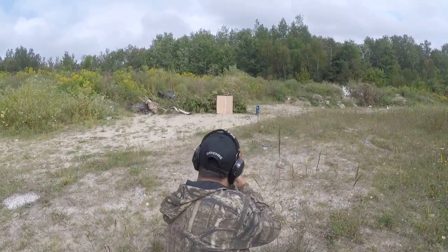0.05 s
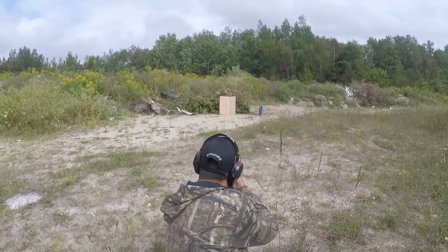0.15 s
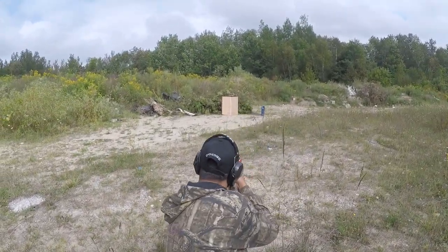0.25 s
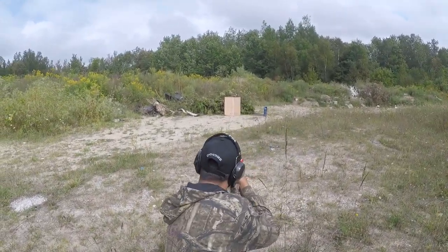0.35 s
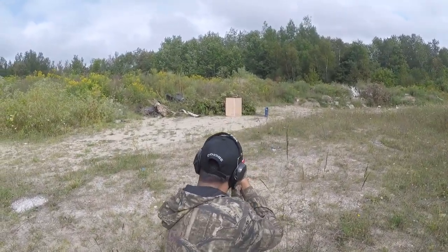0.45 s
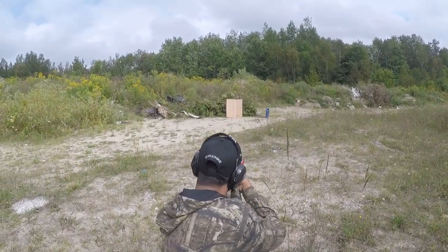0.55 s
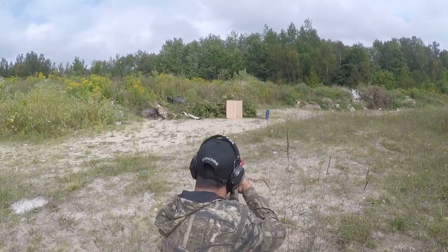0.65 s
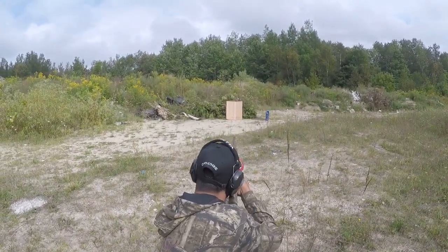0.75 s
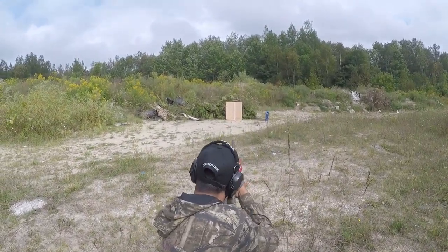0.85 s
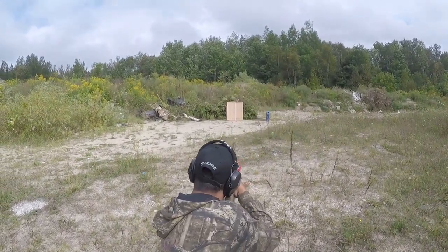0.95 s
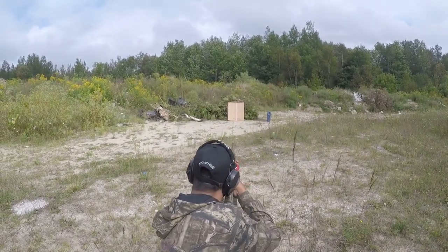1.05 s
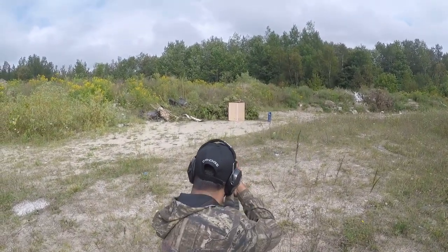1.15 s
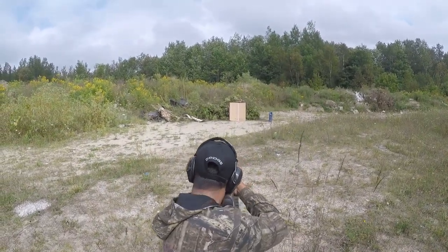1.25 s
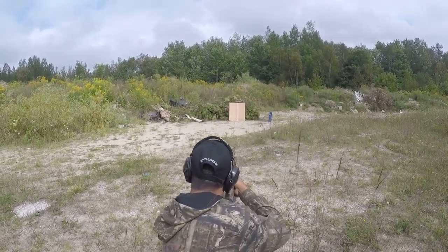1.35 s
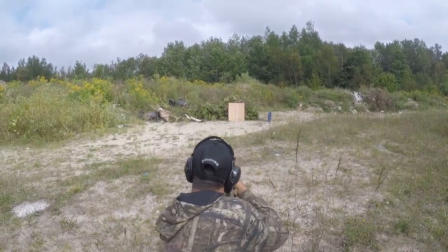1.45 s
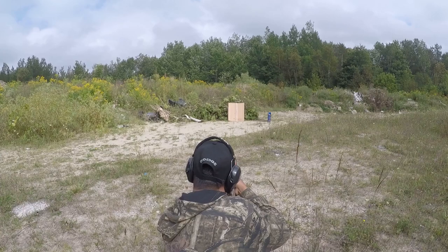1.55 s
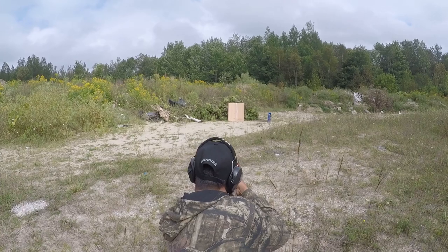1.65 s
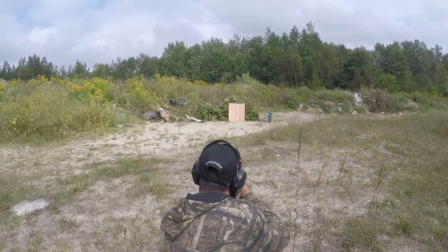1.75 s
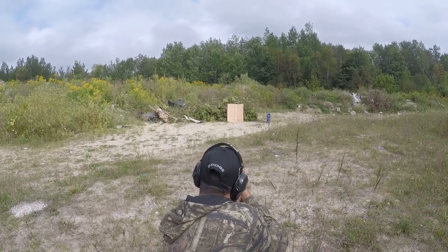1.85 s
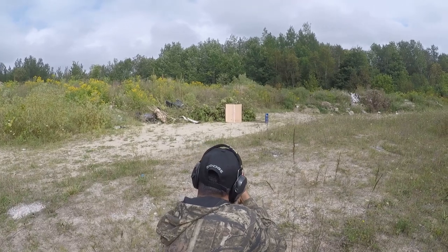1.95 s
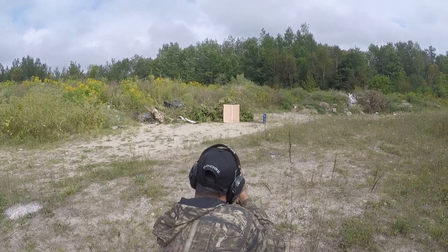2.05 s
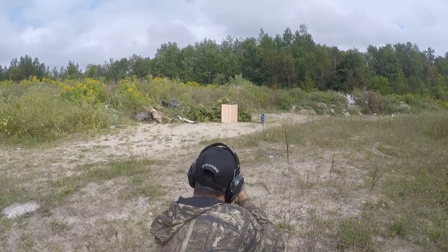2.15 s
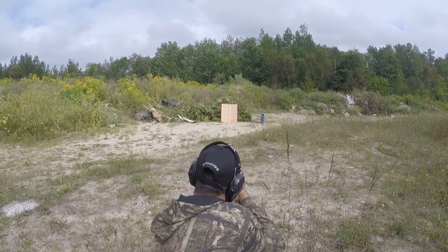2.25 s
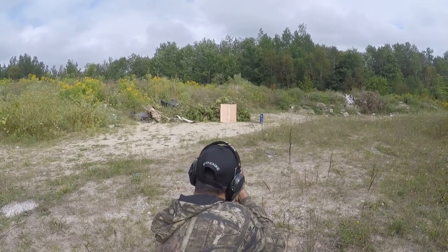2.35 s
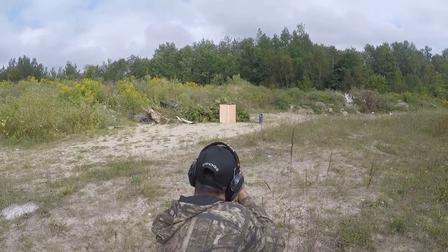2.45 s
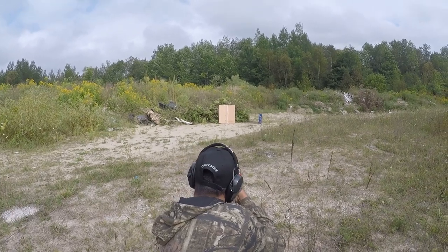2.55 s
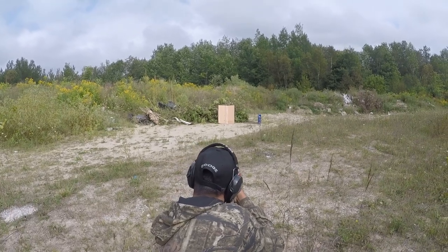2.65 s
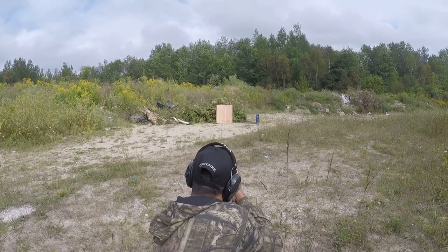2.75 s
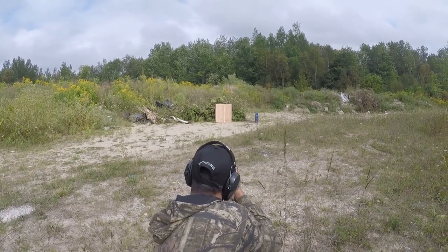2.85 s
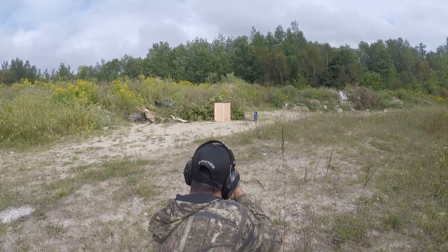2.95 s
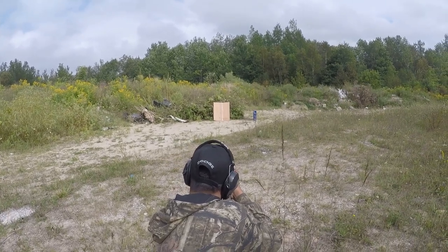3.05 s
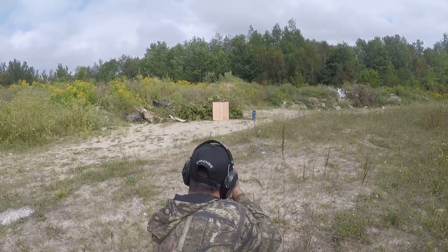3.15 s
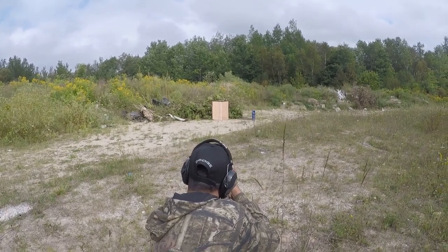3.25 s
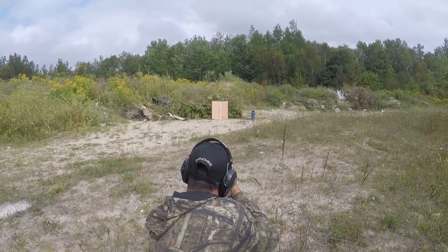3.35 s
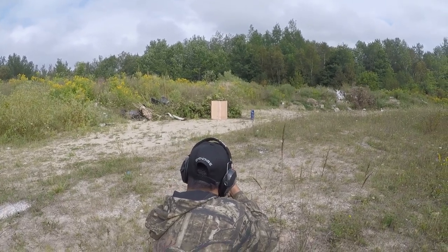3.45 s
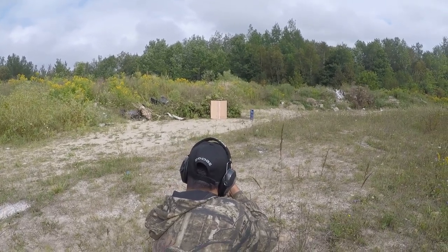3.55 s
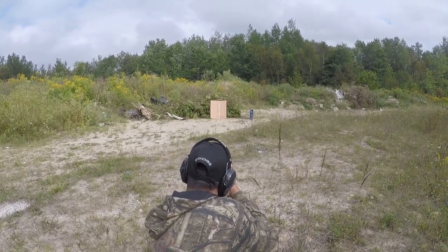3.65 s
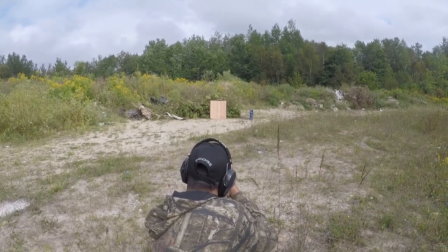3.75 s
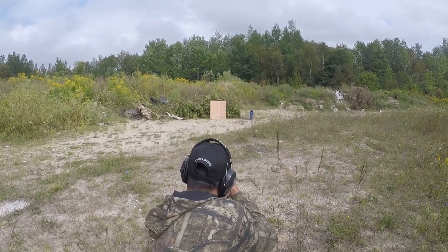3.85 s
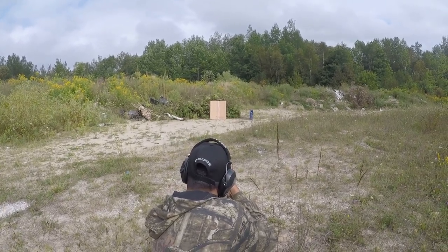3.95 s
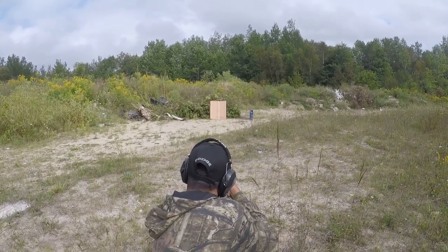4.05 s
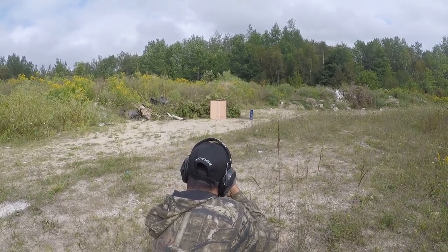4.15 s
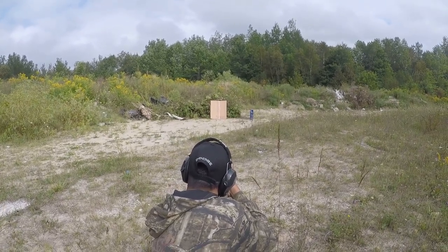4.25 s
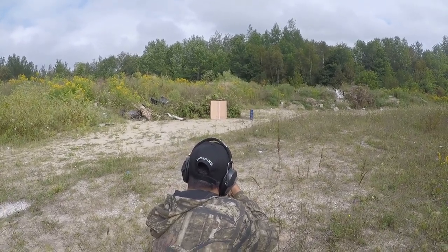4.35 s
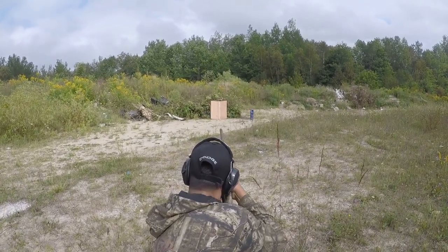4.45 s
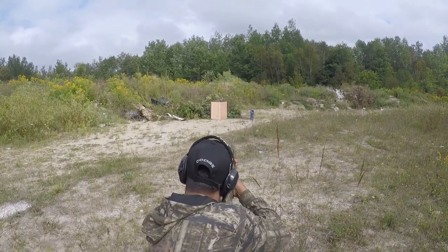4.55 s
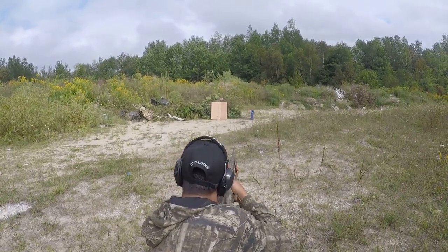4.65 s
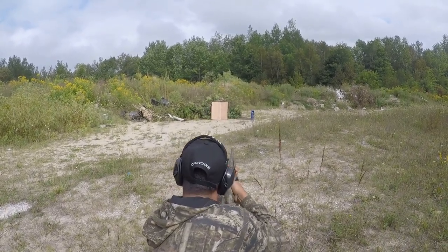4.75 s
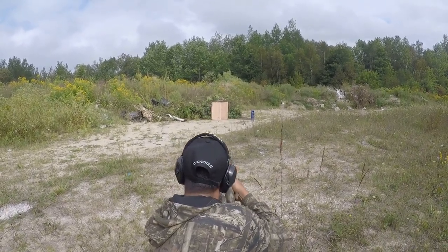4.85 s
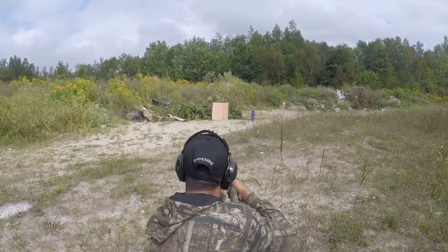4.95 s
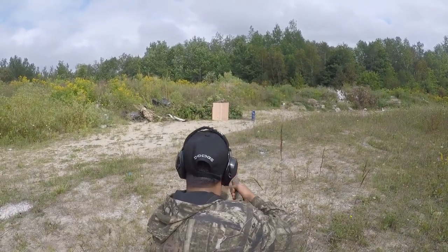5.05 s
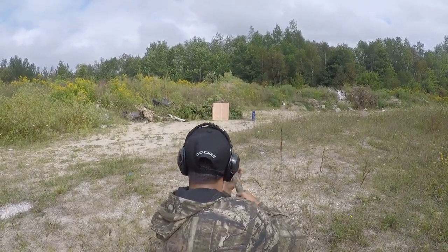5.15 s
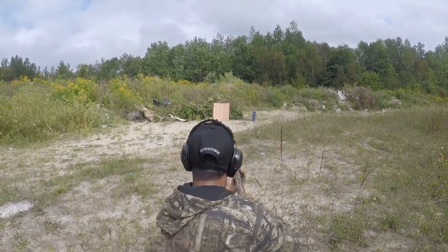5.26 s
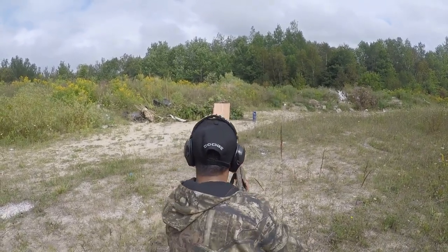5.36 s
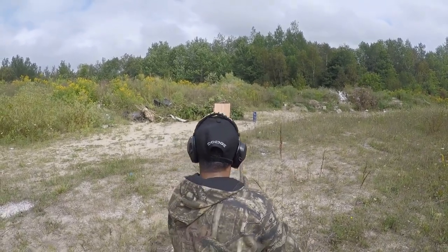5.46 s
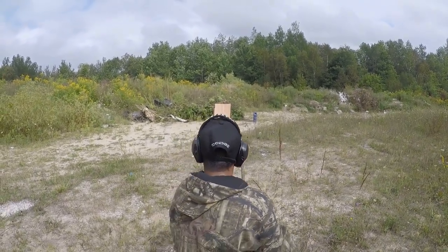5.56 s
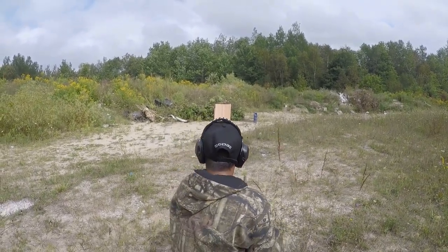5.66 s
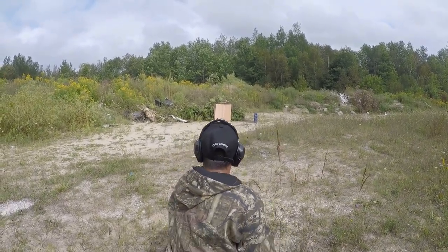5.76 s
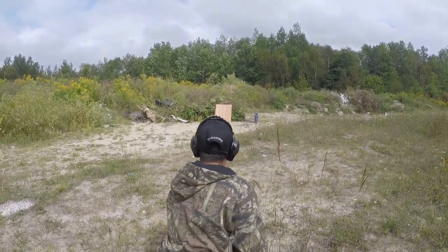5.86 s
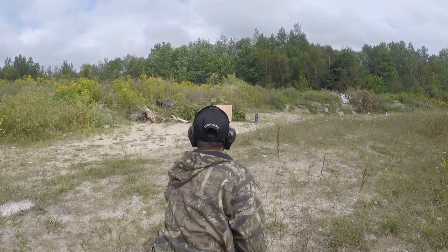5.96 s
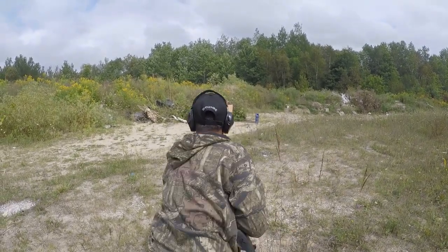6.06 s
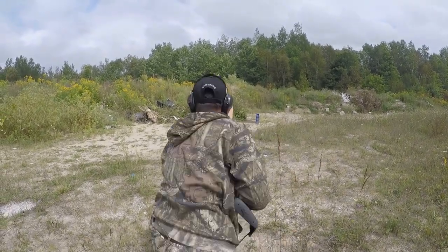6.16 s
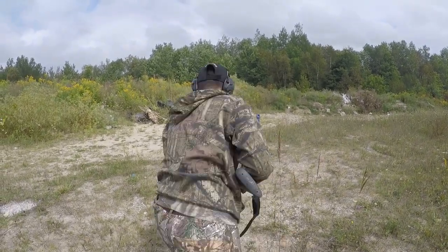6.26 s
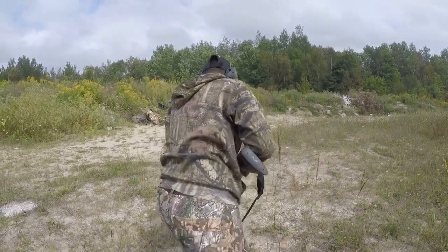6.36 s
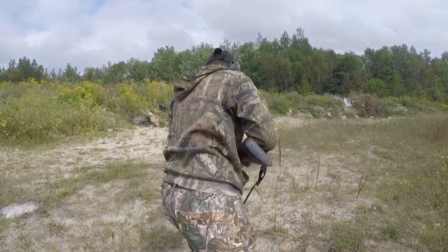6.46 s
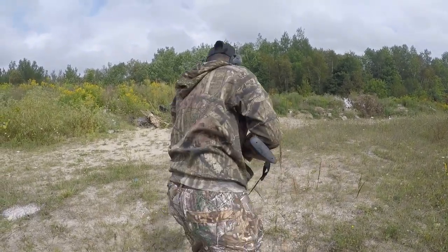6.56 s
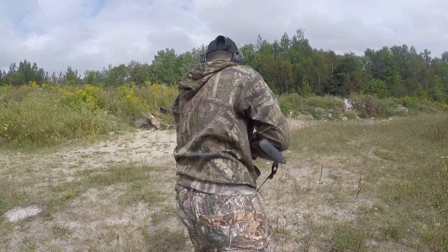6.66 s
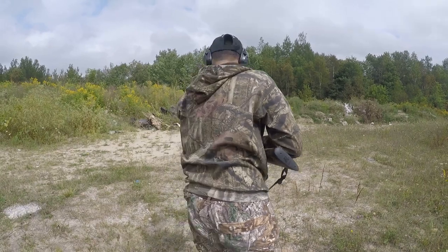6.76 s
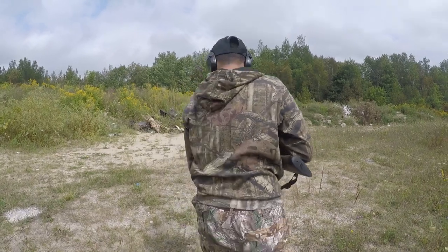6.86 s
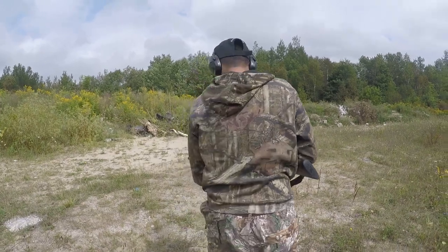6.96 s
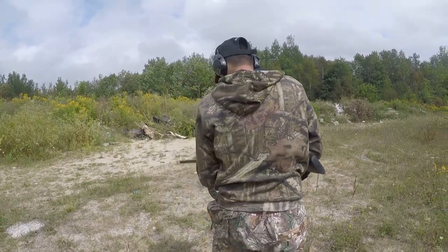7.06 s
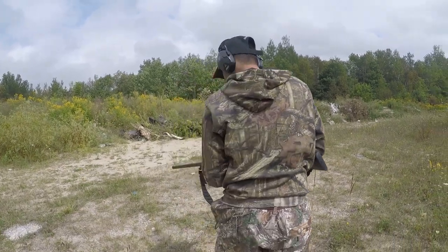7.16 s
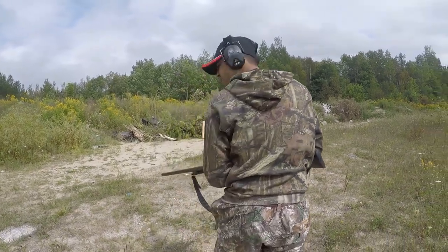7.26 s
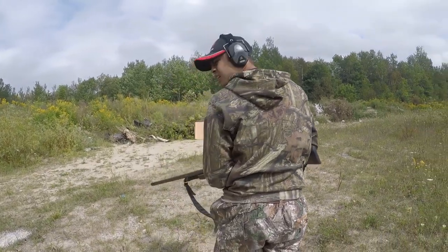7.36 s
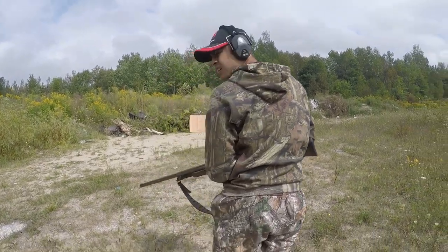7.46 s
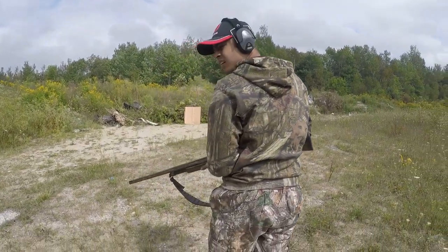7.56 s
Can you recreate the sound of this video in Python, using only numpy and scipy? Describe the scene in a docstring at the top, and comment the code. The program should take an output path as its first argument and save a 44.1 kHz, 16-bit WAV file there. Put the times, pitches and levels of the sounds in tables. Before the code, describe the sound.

A single shotgun blast echoes off trees outdoors, amid close microphone knocks, faint insects and a sharp metal click as the action opens.

```python
"""Shot in a grassy clearing

One shot, heard from a small hand-held camera behind the shooter: a cluster of cracks over a low thump,
then the roar sent back by the tree line. The safety clicks before it and the bolt slides open after it.
Close up, the housing knocks in the hand, fingers tap the stock, cloth rustles and wind puffs on the two
microphone ports. Behind, a cricket, far insects and airy hiss duck under the shot and climb back."""
import sys
import numpy as np
from scipy import signal
from scipy.io import wavfile

SR = 44100
rng = np.random.default_rng(int(sys.argv[2]) if len(sys.argv) > 2 else 0)


def bounce(signal):
    """Save signal as a 16-bit WAV file at the path given by the first command-line argument."""
    frames = np.transpose(np.atleast_2d(signal))
    limited = np.clip(frames, -1, 1)
    pcm = np.round(limited * 32767).astype(np.int16)
    wavfile.write(sys.argv[1], SR, pcm)


N = 335160

# cracks of the shot: t/s, pop level/dB, spit level/dB
CRACKS = [(4.391, -25.5, -19), (4.396, -42.5, -36), (4.402, -16.5, -26.5), (4.4134, -5.5, -16.5),
          (4.4181, -19, -24), (4.423, -4.5, -19.5), (4.4297, -2.5, -12), (4.434, -17, -0.5),
          (4.4365, -14.5, -32)]
# ring of each pop: f/Hz, level/dB, t60/s
POP_MODES = [(668, 1, 0.02), (874, 4, 0.018), (1370, -11, 0.019)]
# tone of the spitting gas: f/Hz, density/dB
GAS_SPECTRUM = [(150, -18), (350, 9), (900, 7.5), (1770, 6), (2970, 6.5), (4840, 0), (5900, 4),
                (8500, -14.5), (10700, -27), (12300, -16), (15000, -38)]
# stereo width of gas and roar: f/Hz, left-right correlation
SHOT_CORRELATION = [(60, 0.37), (130, 0.47), (290, 1), (630, 0.53), (1380, 0.19), (3020, 0.73),
                    (6610, 0.69), (14500, 0.024)]
# their placement: f/Hz, pan/dB
SHOT_PAN = [(60, -1.5), (180, 0.5), (540, -1.5), (1610, -2.5), (4830, -0.5), (14500, 1.5)]
def blast():
    """Pops with a spit of gas each, over a swelling thump, hiss and thin whistle."""
    times, pop_db, spit_db = np.transpose(CRACKS)
    pops = -sum(from_db(db) * ring(strikes(times, pop_db), hz, t60) for hz, db, t60 in POP_MODES) / 2
    pops = butter(pops, 2, 2200)   # soft front
    pops = np.array([pops, 0.86 * np.roll(pops, 4)])   # the far port hears it later and weaker
    spit = die_away(strikes(times, spit_db), t60=0.011)
    hiss = swell(4.405, .029, .003, .005, db=-24)
    gas = coloured(GAS_SPECTRUM, SHOT_CORRELATION, SHOT_PAN, span=(4.38, 4.5)) * (spit + hiss)
    thump_hz, whistle_hz, crest_s, lag_rad = 144, 7920, 4.4213, np.array([[0], [0.7]])
    t = np.arange(N) / SR - crest_s
    left, right = swell(4.399, .017, .012, .015, db=-7), swell(4.401, .010, .018, .009, db=-15)
    thump = np.array([left, right]) * np.cos(2 * np.pi * thump_hz * t - lag_rad)
    whistle = swell(4.4, .025, .005, .011, db=-32) * np.sin(2 * np.pi * whistle_hz * t)
    return pops + gas + thump + whistle


# roar from the bushes, then the tree line: t/s, level/dB
ROAR_ENVELOPE = [(4.44, -50.5), (4.55, -61), (4.60, -51.5), (4.66, -59.5), (4.725, -57), (4.759, -38),
                 (4.81, -43.5), (4.88, -37.5), (5.0, -45), (5.3, -50.5), (6.75, -53.5), (6.95, -50)]
# its tone before the treble tilt: f/Hz, density/dB
ROAR_SPECTRUM = [(88, -45), (150, 5), (300, 4.5), (450, -1.5), (900, 5), (1500, -2.5), (2400, -8.5),
                 (4000, -15.5), (6300, -18.5), (8500, -46), (13000, -67.5)]
# sharp returns inside it: t/s, level/dB
SLAPS = [(4.492, -36), (4.507, -42), (4.517, -44), (4.573, -44), (4.824, -38)]
def roar():
    """Leaf and trunk echoes merge into noise that dulls as farther trees answer; a few stand out."""
    tree_line_s, dulling_s = 4.753, 0.38
    near_tilt, far_tilt = 8.5, -2.5   # dB per octave above 1 kHz
    later = np.maximum(np.arange(N) / SR - tree_line_s, 0)
    tilt = far_tilt + (near_tilt - far_tilt) * np.exp(-later / dulling_s)
    span = ROAR_ENVELOPE[0][0], ROAR_ENVELOPE[-1][0]
    echoes = coloured(ROAR_SPECTRUM, SHOT_CORRELATION, SHOT_PAN, span, tilt_db=tilt)
    slaps = die_away(strikes(*np.transpose(SLAPS)), t60=0.024)
    slaps = signal.lfilter([.02], [1, -.98], slaps)   # scattered fronts rise over a millisecond
    return echoes * (fader(ROAR_ENVELOPE) + slaps)


# booming echoes: t/s, level/dB, f/Hz
BOOMS = [(4.443, -23.5, 253), (4.491, -16, 184), (4.511, -24, 231), (4.533, -24.5, 187), (4.556, -30, 151),
         (4.578, -22.5, 207), (4.589, -20, 235), (4.609, -26, 245), (4.629, -25, 183), (4.824, -22.5, 980)]
def booms():
    """The near ground and bank throw back booms, each ringing for 12 cycles behind a brief front."""
    bodies = sum(ring(strikes([s], [db]), hz, t60=12 / hz) for s, db, hz in BOOMS)
    times, level_db, _ = np.transpose(BOOMS)
    fronts = ring(strikes(times, level_db - 17), hz=463, t60=0.031)
    return butter(bodies + fronts, 2, [110, 1300], "band")


# safety, buckle and bolt clicks: t/s, level/dB, pan/dB, centre f/Hz, spread/octaves, rattle/s
CLICKS = [(0.908, -46, 0, 705, 0.49, 0.0038), (0.9244, -39.5, -1, 2840, 0.98, .0043),
          (.986, -51, 2, 1910, 0.69, .0062), (0.999, -46.5, -2, 5300, 2.1, .0025),
          (6.913, -45.5, -2, 3070, 0.36, 0.0081), (6.938, -40, -5, 3300, 0.54, .0028),
          (6.945, -42, -1, 4200, 0.68, .0024), (6.956, -49, -1, 4300, .6, 0.002),
          (6.961, -37, 2, 2500, 1.3, 0.0021), (6.9669, -28.5, 8, 4380, 0.73, 0.001),
          (6.9674, -48, -3, 9300, .94, .001), (6.9675, -26, -5.5, 1310, 1.77, .0017),
          (6.973, -44.5, -4, 5950, 0.92, 0.0046)]
# ring of the steel: f/Hz, t60/s
STEEL_MODES = [(600, 0.013), (870, 0.012), (1050, 0.015), (1287, 0.0034), (1550, 0.0032), (1850, 0.016),
               (2250, 0.0042), (2800, 0.0048), (3250, 0.014), (3650, 0.0042), (4100, 0.0074),
               (4650, 0.0083), (5400, 0.0055), (6105, 0.0097), (6815, 0.0084), (7600, 0.0023),
               (9300, 0.0014), (12500, 0.00094)]
# while the action is worked: start/s, end/s
HANDLING = [(.9, 1.1), (6.85, 7.1)]
BOLT_STOP_S = 6.9668
def action():
    """Each click rattles the steel modes near its pitch; the bolt scrapes open and slams on its stop."""
    out = -ring(strikes([BOLT_STOP_S], [-1]), hz=1250, t60=.007) * pan(-6.5)
    scrape = swell(6.905, .054, .002, .014, db=-50.5) * pan(-1)
    t = np.arange(SR // 20) / SR
    busy = np.concatenate([np.arange(round(start * SR), round(end * SR)) for start, end in HANDLING])
    for hz, t60 in STEEL_MODES:
        force = scrape * from_db(-6 * np.log2(hz / 3600) ** 2)
        for s, db, pan_db, centre_hz, spread, rattle_s in CLICKS:
            share_db = -6 * (np.log2(hz / centre_hz) / spread) ** 2
            rattle = t / rattle_s * np.exp(1 - 2 * t / rattle_s)
            i = round(s * SR)
            force[:, i:i + len(t)] += from_db(db + share_db) * pan(pan_db) * rattle
        contacts = rng.standard_normal(len(busy)) + 0.66 * rng.standard_normal((2, len(busy)))
        out[:, busy] += ring(force[:, busy] * contacts, hz, t60)
    return out


# blows that rock the housing, ports nearly opposed: t/s, level/dB, pan/dB, f/Hz, snap/dB
ROCKING_KNOCKS = [(.263, -27, 10, 136, -26), (.29, -30, 14, 120, -23), (.332, -29, 17, 180, -27),
                  (.615, -22.5, -2, 262, -14), (.633, -35, 2, 122, 2), (.712, -23.5, 2.5, 275, -6),
                  (1.904, -22.5, 2.5, 274, -7.5), (2.056, -24, 0, 295, -5), (2.585, -15, -4, 269, -7),
                  (2.595, -11.5, 0, 286, -5.5), (2.691, -26, -3, 186, -16), (2.734, -19, 0.5, 283, -4),
                  (2.922, -14, 1.5, 288, -5.5), (2.964, -24.5, -4, 262, -21),
                  (3.001, -16.5, -2.5, 322, -11), (3.016, -13.5, 0, 290, -14), (3.131, -16.5, -5, 219, -8),
                  (3.148, -18, 1, 195, -3.5), (3.161, -17, -4, 278, -24), (3.185, -5.5, 0.5, 303, -6),
                  (3.324, -17.5, -1.5, 193, -8), (3.367, -30, -3, 197, -3), (3.382, -8, 1.5, 294, -6),
                  (3.511, -22.5, -0.5, 275, -6), (3.961, -27, -2, 170, -12), (3.995, -16.5, 1, 275, -3.5),
                  (4.303, -17.5, 0, 286, -5.5), (5.518, -30, -2, 272, -8), (6.322, -21, -11, 89, -23),
                  (6.357, -26, -14, 121, -21), (6.495, -13.5, -3, 250, -6), (6.614, -10.5, -4.5, 280, -14),
                  (6.666, -15.5, 0, 267, -5.5), (6.681, -26, -9, 118, -27), (6.791, -6.5, 2, 310, -24),
                  (6.842, -17, -2, 158, -13), (6.862, -10, 4.5, 250, -6), (6.895, -25, -1, 120, -6),
                  (6.918, -21, -4, 130, -10), (7.009, -13.5, -3.5, 159, -24), (7.056, -9, -1, 278, -7.5),
                  (7.124, -23, 2.5, 184, -3), (7.463, -13, -3.5, 235, -28), (7.469, -11, -2.5, 260, -14),
                  (7.531, -20, 2, 273, -6.5)]
# blows that shove it whole, ports more in step: t/s, level/dB, pan/dB, f/Hz, snap/dB
SHOVING_KNOCKS = [(1.704, -27, -2, 172, -18), (2.202, -22, 2, 210, -18), (5.758, -21, -2, 101, -33),
                  (6.757, -12.5, 0, 232, -18), (7.31, -26.5, -1, 176, -8), (7.361, -18, -1, 325, -12),
                  (7.376, -23.5, 0, 150, -23), (7.441, -17.5, -2, 230, -23)]
# its higher rings: f/Hz, level/dB, decay/s, factor on the phase lag
SNAP_MODES = [(567, 9.5, 0.0016, 1.197), (938, 4, 0.0017, 1.125), (1370, 5.5, 0.0011, 1.06)]
def housing_knocks(blows, lag_rad):
    """Each blow rings the housing with a damped low body and a snap, out of phase between the ports."""
    out, t = np.zeros((2, N + SR)), np.arange(SR // 10) / SR
    rise = (1 - np.exp(-t / 0.00071)) ** 3
    rad_per_hz, lag = 2 * np.pi * (t - .002), np.array([[0], [lag_rad]])
    snap = sum(from_db(db) * np.exp(-t / decay) * np.cos(hz * rad_per_hz - factor * lag)
               for hz, db, decay, factor in SNAP_MODES)
    for s, db, pan_db, hz, snap_db in blows:
        body = np.exp(-t * hz / 1.32) * np.cos(hz * rad_per_hz - lag)
        i = round(s * SR)
        out[:, i:i + len(t)] += from_db(db) * pan(pan_db) * rise * (body + from_db(snap_db) * snap)
    return butter(out[:, :N], 4, [135, 1750], "band")


# fingertip taps: t/s, level/dB, pan/dB
TAPS = [(0.134, -28, -3), (0.524, -32.5, -1.5), (0.601, -31.5, -7.0), (0.646, -33, -3), (1.335, -36, -0.5),
        (1.44, -25, -2)]
# ring of the stock: f/Hz, level/dB, t60/s
STOCK_MODES = [(493, -5, 0.022), (620, -6, 0.038), (872, -3, 0.059), (1230, -17.5, 0.007)]
def stock_taps():
    """Soft fingertip blows ring the hollow stock."""
    times, level_db, pan_db = np.transpose(TAPS)
    blows = np.array([strikes(times, level_db + pan_db / 2), strikes(times, level_db - pan_db / 2)])
    soft = butter(blows, 2, 1600)
    return sum(from_db(db) * ring(soft, hz, t60) for hz, db, t60 in STOCK_MODES)


# cloth and sling moves: t/s, hold/s, dull level/dB, bright level/dB
RUSTLES = [(0.177, 0.071, -53, -50), (0.584, 0.056, -43.5, -59), (6.746, 0.0028, -37.5, -48),
           (6.974, 0.053, -62, -51.5), (7.041, .004, -51, -55), (7.104, .01, -57, -53),
           (7.294, 0.04, -46.5, -56), (7.346, .008, -40.5, -56)]
def rustle():
    """Folds of cloth slip in dull crumples and bright swishes."""
    attack_s, release_s = 0.012, .035
    dull = sum(swell(s, attack_s, hold, release_s, db) for s, hold, db, _ in RUSTLES)
    bright = sum(swell(s, attack_s, hold, release_s, db) for s, hold, _, db in RUSTLES)
    crumple = band(band(grains(per_s=900, spread_db=2), 350, 1560), 330, 1900) * pan(-9)
    swish = band(grains(per_s=5000, spread_db=4) + .5 * rng.standard_normal((2, N)), 4750, 7100)
    return dull * crumple + bright * swish


# wind on the ports: t/s, level/dB
WIND_ENVELOPE = [(0, -37), (.15, -43), (.55, -45), (.9, -51.5), (1.65, -53.5), (1.85, -59), (2.26, -55.5),
                 (2.6, -73), (2.96, -57), (3.45, -74), (4.38, -75), (4.6, -57), (4.87, -67), (5.5, -56.5),
                 (5.95, -48), (6.37, -44.5), (6.65, -35), (6.92, -44), (7.37, -48.5), (7.6, -59)]
def wind():
    """Low turbulence, partly shared by the ports, puffs unevenly on each."""
    turbulence = band(0.76 * rng.standard_normal(N) + rng.standard_normal((2, N)), 22.7, 75.6)
    puffs = from_db([2.8 * drift(7.5), 7.66 * drift(6.8)])
    return fader(WIND_ENVELOPE) * turbulence * puffs


# low rumble swells: t/s, hold/s, level/dB
RUMBLE_SWELLS = [(0, 0.086, -48.5), (0.197, .12, -54.5), (0.603, 0.034, -50.5), (1.29, 0.14, -56.5),
                 (1.75, 0.41, -56.5), (3.0, 0.13, -43.5), (4.505, 0.084, -46), (5.65, .05, -58.5),
                 (6.28, .08, -56), (6.548, .04, -39), (6.87, 0.063, -38), (7.043, 0.059, -48.5),
                 (7.41, .15, -46)]
def low_rumble():
    """A lumpy rumble swells from the hand on the housing, and once from the shot's low echo."""
    swells = sum(swell(s, 0.066, hold, .12, db) for s, hold, db in RUMBLE_SWELLS)
    rumble = band(band(rng.standard_normal((2, N)), 133, 342), 133, 480)
    lumps = from_db(4 * drift(14.4))
    return (from_db(-62.5) + swells) * rumble * lumps


# two bouts of trilling, the second after the shot: start/s, one stroke at t/s, stroke rate/Hz
BOUTS = [(0, 2.1093, 35.433), (4.9, 6.4938, 35.46)]
# fade of each bout: starting level/dB, slope/(dB per s)
BOUT_FADES = [(-53, 0.68), (-52.5, -.5)]
def cricket():
    """Each wing stroke is a falling tone, rippled by the teeth of the file."""
    wing_hz, sweep_hz, tooth_hz = 3665, 105, 328
    t = np.arange(N) / SR
    bout = (t > BOUTS[1][0]).astype(int)
    start, stroke_s, rate = np.transpose(BOUTS)[:, bout]
    db, db_per_s = np.transpose(BOUT_FADES)[:, bout]
    beat = 2 * np.pi * rate * (t - stroke_s)
    strokes = np.exp(1.01 * (np.cos(beat) - 1)) * from_db(0.64 * drift(21))
    tone = np.sin(phase(wing_hz - sweep_hz * np.sin(beat) + 12 * drift(4)))
    teeth = 1 + .5 * np.cos(phase(tooth_hz + 40 * drift(25)))
    return from_db(db + db_per_s * (t - start)) * pan(-5.5) * rms_one(strokes * teeth * tone)


# insect chorus: low f/Hz, high f/Hz, level/dB, change once startled/dB, throb/Hz, depth 0-1, pan/dB
FAR_INSECTS = [(3290, 3480, -55.5, -2, 31, 0, -2), (3694, 4080, -59, -2, 29, .3, -1),
               (7160, 8580, -66, -2.5, 16, 0.18, -12), (8820, 9050, -81.5, -5, 16.6, 0.5, -19.5)]
def far_insects():
    """Distant singers blur into narrow bands that throb, quieter once the shot has startled them."""
    out, startled = 0, np.arange(N) > CRACKS[0][0] * SR
    for low_hz, high_hz, db, startled_db, rate, depth, pan_db in FAR_INSECTS:
        throb = 1 + depth * np.cos(phase(rate * (1 + 0.0322 * drift(1))))
        noise = rng.standard_normal(N) + 3.1 * rng.standard_normal((2, N))
        song = band(band(noise, low_hz, high_hz), low_hz, high_hz)
        out = out + from_db(db + startled_db * startled) * pan(pan_db) * throb ** 2 * song
    return out


# tone of the clearing: f/Hz, density/dB
AIR_SPECTRUM = [(70, -30), (100, -82), (132, -2), (167, 1.5), (300, -9), (627, -7), (1300, -13.5),
                (2620, -20.5), (4400, -21), (6200, -16), (7000, -16.5), (8500, -23), (10400, -33.5),
                (12400, -36.5), (14900, -65)]
# its stereo width: f/Hz, left-right correlation
AIR_CORRELATION = [(60, 0.5), (130, 0.19), (290, -0.005), (630, -0.77), (1380, -0.49), (3020, 0.75),
                   (6610, -0.42), (14500, -0.3)]
# its placement: f/Hz, pan/dB
AIR_PAN = [(60, 30.5), (180, -4), (540, -0.5), (1610, -0.5), (4830, -1.5), (14500, -3.5)]
def air():
    """A bed of low murmur and hiss whose bands flicker slightly."""
    bed = coloured(AIR_SPECTRUM, AIR_CORRELATION, AIR_PAN, span=(0, N / SR), flicker_db=0.77)
    return from_db(-46.5) * bed


def ducking():
    """Gain of the background: it drops at the shot, sinks, stays, climbs back and dips at the bolt slam."""
    t = np.arange(N) / SR
    drop_db, deepest_db, recovery_db_per_s = -13, -20.5, 13.5
    turns = np.cumsum([CRACKS[2][0], .04, .25, 0.56, -deepest_db / recovery_db_per_s])
    shot_db = np.interp(t, turns, [0, drop_db, deepest_db, deepest_db, 0])
    after = np.maximum(t - BOLT_STOP_S, 0)
    slam_db = -3.5 * (after > 0) * np.exp(-after / 0.12)
    return from_db(shot_db + slam_db)


def from_db(db):
    """Decibels to gain."""
    return 10 ** (np.asarray(db) / 20)


def rms_one(x):
    """Scale to unit rms."""
    return x / np.sqrt(np.mean(x ** 2) + 1e-20)


def pan(db):
    """Stereo gains for a left-minus-right level difference."""
    return from_db(np.array([[.5], [-.5]]) * db)


def phase(hz):
    """Running phase of a changing frequency."""
    return 2 * np.pi * np.cumsum(hz) / SR


def fader(points):
    """Gain that rides through (t/s, level/dB) points."""
    return from_db(np.interp(np.arange(N) / SR, *np.transpose(points)))


def swell(start, attack, hold, release, db):
    """Gain that rises, holds and falls in straight lines; times in seconds."""
    return from_db(db) * np.interp(np.arange(N) / SR, np.cumsum([start, attack, hold, release]), [0, 1, 1, 0])


def drift(hz):
    """Slow random wander of unit rms."""
    r = np.exp(-80 * np.pi * hz / SR)
    slow = signal.lfilter([1], [1, -2 * r, r * r], rng.standard_normal(N // 40 + 2002))[2000:]
    return np.interp(np.arange(N) / 40, np.arange(len(slow)), rms_one(slow))


def butter(x, order, hz, kind="low"):
    """Butterworth filter."""
    return signal.sosfilt(signal.butter(order, hz, kind, fs=SR, output="sos"), x)


def band(x, low_hz, high_hz):
    """Band-pass to unit rms."""
    return rms_one(butter(x, 2, [low_hz, high_hz], "band"))


def strikes(times, levels_db):
    """A click at each time."""
    clicks = np.zeros(N)
    clicks[np.round(np.asarray(times) * SR).astype(int)] = from_db(levels_db)
    return clicks


def grains(per_s, spread_db):
    """Random clicks of uneven size."""
    sizes = from_db(spread_db * np.minimum(rng.exponential(1, N), 4)) * rng.choice([-1, 1], N)
    return sizes * (rng.random(N) < per_s / SR)


def die_away(clicks, t60):
    """Give each click an exponential tail."""
    return signal.lfilter([1], [1, -from_db(-60 / (t60 * SR))], clicks)


def ring(clicks, hz, t60):
    """Each click sets a damped sine ringing."""
    r, w = from_db(-60 / (t60 * SR)), 2 * np.pi * hz / SR
    return signal.lfilter([0, np.sin(w)], [1, -2 * r * np.cos(w), r * r], clicks + 1e-18)


def at_hz(points, hz):
    """Read a curve on a log-frequency axis."""
    freqs, values = np.transpose(points)
    return np.interp(np.log(hz), np.log(freqs), values)


def coloured(spectrum, correlation, pans, span, flicker_db=0, tilt_db=None):
    """Third-octave bands of stereo noise over a span of seconds; unit rms before flicker and tilt."""
    part, out = slice(round(span[0] * SR), round(span[1] * SR)), np.zeros((2, N))
    power, edges = 0, 80 * 2 ** np.arange(0, 7.9, 1 / 3)
    white = rng.standard_normal((2, 2, N))[..., part]
    for k, (low, high) in enumerate(zip(edges, edges[1:])):
        mid, side = band(white[k % 2], low, high)
        hz = np.sqrt(low * high)
        gain = from_db(at_hz(spectrum, hz)) * np.sqrt(high - low)
        power += 2 * gain ** 2
        if flicker_db:
            gain = gain * from_db(flicker_db * drift(22)[part])
        if tilt_db is not None:
            gain = gain * from_db(tilt_db[part] * max(np.log2(hz / 1000), 0))
        alike = np.clip(at_hz(correlation, hz), -1, 1)
        pair = np.sqrt(1 + alike) * mid + np.sqrt(1 - alike) * side * [[1], [-1]]
        out[:, part] += gain * pan(at_hz(pans, hz)) * pair
    return out / np.sqrt(power)


def scene():
    """The shot and the close handling sounds over the ducked background."""
    background = ducking() * (air() + cricket() + far_insects())
    shot = blast() + roar() + booms()
    knocks = housing_knocks(ROCKING_KNOCKS, lag_rad=-2.444) + housing_knocks(SHOVING_KNOCKS, lag_rad=1.25)
    return shot + knocks + stock_taps() + wind() + low_rumble() + rustle() + action() + background


def record(dry):
    """Soft saturation rounds the peaks; a steep low-pass cuts the top."""
    rounded = 1.228 * np.tanh(dry / 1.195)
    return signal.sosfilt(signal.cheby2(12, 70, 15060, fs=SR, output="sos"), rounded)


dry = scene()
out = record(dry)
bounce(out)
```